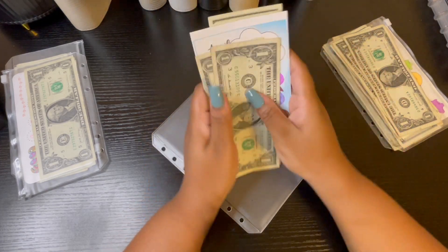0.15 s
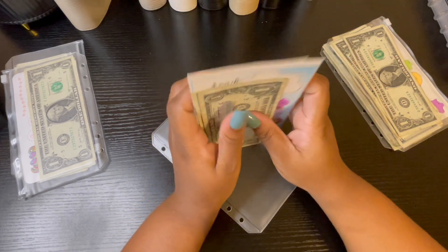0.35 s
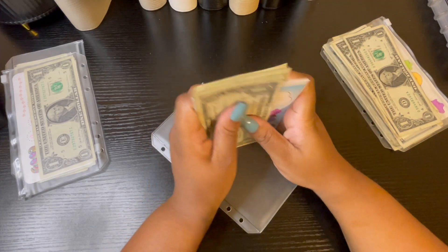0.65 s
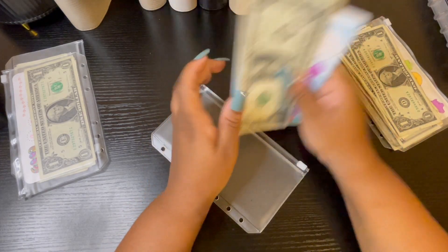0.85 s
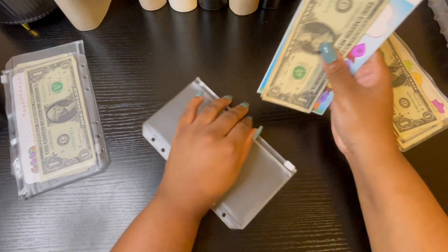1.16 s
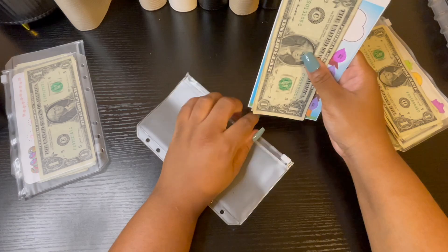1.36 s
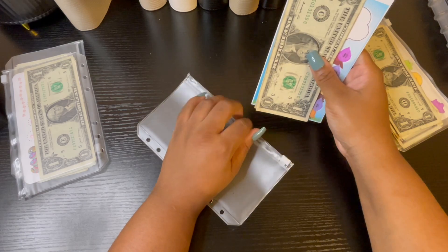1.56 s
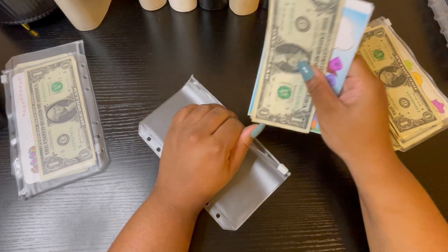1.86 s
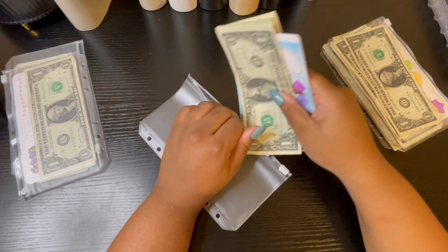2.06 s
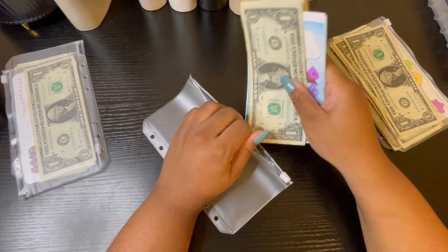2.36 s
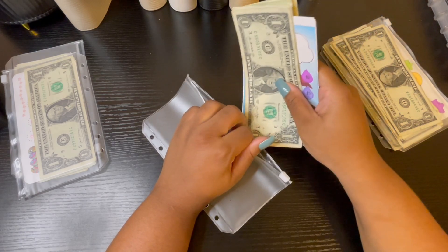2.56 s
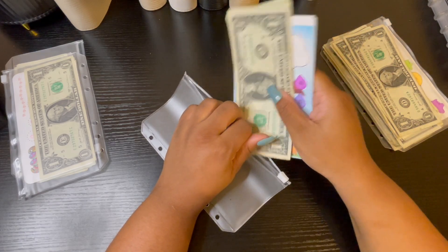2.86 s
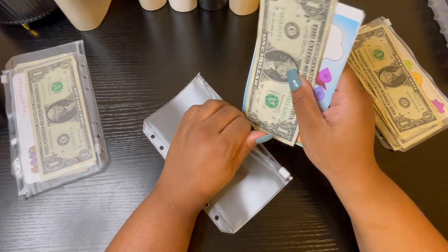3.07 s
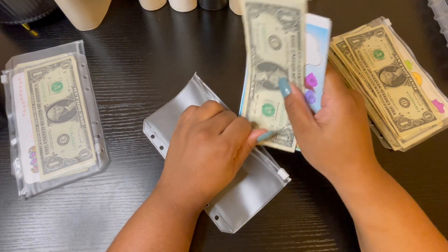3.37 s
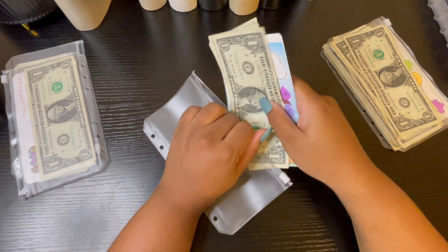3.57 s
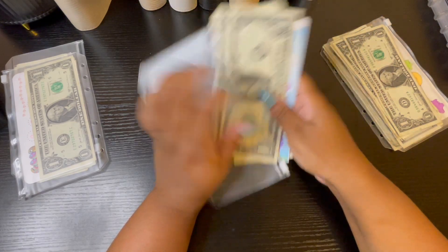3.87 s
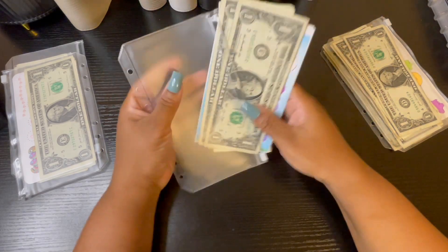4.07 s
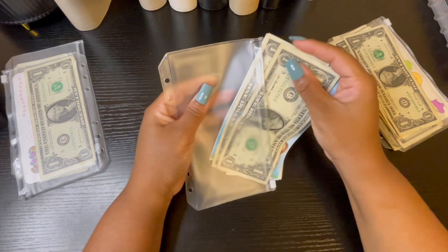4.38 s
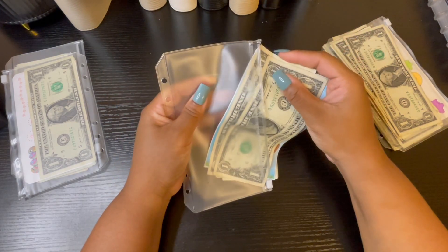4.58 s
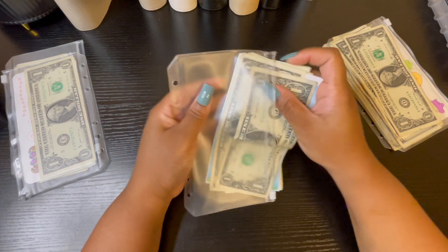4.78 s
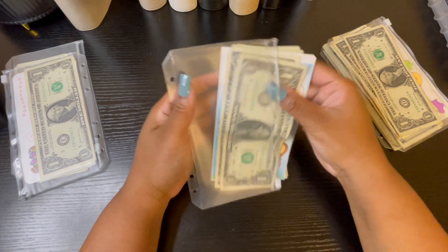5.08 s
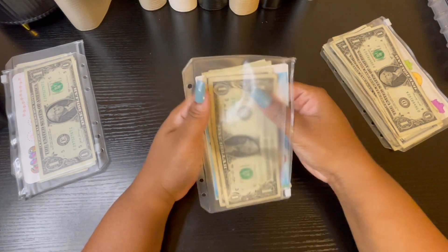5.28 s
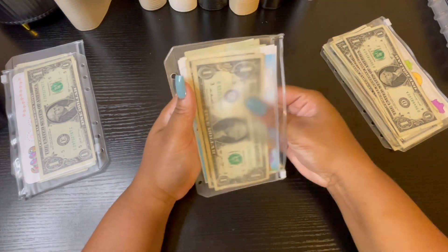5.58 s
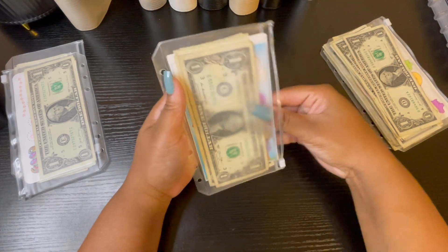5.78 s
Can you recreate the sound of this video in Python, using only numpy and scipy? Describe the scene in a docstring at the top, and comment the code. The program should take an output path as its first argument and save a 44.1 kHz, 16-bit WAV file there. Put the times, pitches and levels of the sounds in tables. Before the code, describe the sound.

Close to the microphone, hands shuffle paper bills in short, dry rustling strokes, with sharp crease snaps and a few soft knocks on a wooden desk. The handling grows busier and louder in the second half as the cash slides into a crinkling plastic pocket, then eases off. A steady electrical hum and a low room rumble sit underneath in a small indoor space.

```python
"""Counting bills at a desk

Close up, from a phone above a wooden desk: hands count paper bills and slide them into a plastic pocket.
The sheets stick and slip in dense tiny jerks, creases snap, and knocks of the hands ring the desk
and shake the paper. Behind them a mains appliance hums over low room rumble.
Room reflections reach the phone's two microphone ports differently and give a little width."""
import sys
import numpy as np
from scipy import signal
from scipy.fft import rfft, irfft
from scipy.io import wavfile
from scipy.ndimage import uniform_filter1d

SR = 44100
rng = np.random.default_rng(int(sys.argv[2]) if len(sys.argv) > 2 else 0)


def dump_mix(stems):
    """Bounce the given channels to the path in sys.argv[1] as a 16-bit WAV at rate SR."""
    frames = np.atleast_2d(stems).T  # one column per channel
    limited = np.clip(frames, -1, 1)  # hard clip at full scale
    pcm = np.round(limited * 32767).astype(np.int16)
    wavfile.write(sys.argv[1], SR, pcm)


N = 261513


def undb(db):
    return 10 ** (np.asarray(db) / 20)


def at_rms(x, db):
    return x * undb(db) / np.sqrt(np.mean(x ** 2))


def per_bin(table):
    """A (frequency [Hz], value) table read at every spectrum bin."""
    hz, value = np.transpose(table)
    return np.interp(np.log(np.arange(N // 2 + 1) * SR / N + 1), np.log(hz + 1), value)


def band(x, hz, width):
    """Two-pole resonance, gain 1 at the centre."""
    return signal.lfilter(*signal.iirpeak(min(hz, .45 * SR), hz / width, SR), x)


def smooth(x, samples):
    return uniform_filter1d(uniform_filter1d(x, samples), samples)


def wander(rate):
    """Random levels held 1 / rate s and smoothed; spread near 1."""
    hold = int(SR / rate)
    return 1.05 * smooth(np.repeat(rng.standard_normal(N // hold + 1), hold), hold)[:N]


# The appliance in the background: (frequency [Hz], rms level [dB])
HUM_TONES = [(59.9, -57), (119.9, -39.5), (147, -72.5), (239.8, -72.5), (359.7, -74)]
def appliance_hum():
    """Mains hum that barely wavers."""
    t = np.arange(N) / SR
    return sum(np.sqrt(2) * undb(db + 0.48 * wander(5.8)) * np.sin(2 * np.pi * (hz * t + rng.random()))
               for hz, db in HUM_TONES)


# The air of the room around the desk: (frequency [Hz], relative spectral density [dB])
ROOM_SPECTRUM = [(25, -43), (45, 7), (65, -6), (100, -1.5), (220, -17.5), (380, -24.5), (480, -37.5),
                 (950, -37), (1150, -33), (1400, -40), (2200, -47.5), (3300, -61.5), (6500, -46),
                 (12000, -48.5), (16000, -46)]
def room_tone():
    """Low rumble and faint air hiss."""
    air = irfft(rfft(rng.standard_normal(N)) * undb(per_bin(ROOM_SPECTRUM)), N)
    return at_rms(air, -49.5)


# What the hands hold, from counting to filling the pocket:
# (time [s], stack gain [dB], pocket gain [dB], edge gain [dB], idle shuffling level [dB])
HANDLING = [(0, -3, 0.5, 1, -69), (0.5, -2.5, -7, 4.5, -80), (0.9, -3, -1, 0.5, -76),
            (1.2, -3, -8, -2.5, -80), (1.7, -7.5, -7, -5, -75.5), (2.2, -6, 0, -1, -90),
            (2.8, -6, -6, -7.5, -62), (3.3, -5.5, -5, -2, -81.5), (3.7, -7, -3, -6.5, -59),
            (3.95, -3, -2.5, -4.5, -70.5), (4.1, -2, -12, -5.5, -89), (4.4, -1, -3.5, -2.5, -72),
            (4.6, 1.5, -2, -8.5, -66.5), (4.9, -3.5, -1.5, -4.5, -60.5), (5.15, 0, 3, -5, -64),
            (5.3, 6.5, 6, -1.5, -80), (5.5, -4, 6.5, -3.5, -68.5), (5.93, -3.5, 2, -6, -72)]
# Slides just below the phone: (start [s], length [s], midpoint level [dB], swell start to end [dB])
SLIDES = [(0.036, 0.034, -65.5, 17), (0.085, 0.075, -55, 0.5), (0.176, 0.075, -59.5, 11),
          (0.422, 0.047, -61, -14), (0.648, 0.042, -62, 3), (0.7, 0.14, -62.5, 4.5),
          (0.936, 0.062, -64.5, 0), (1.047, 0.18, -55, 3), (1.315, 0.12, -71.5, -10),
          (1.667, 0.026, -60.5, -15), (2.029, 0.045, -52, 0), (2.079, 0.11, -55, -1.5),
          (2.219, 0.059, -48, 5), (2.374, 0.2, -67.5, -5.5), (2.638, 0.077, -53.5, 12),
          (2.719, 0.091, -56.5, 0), (2.844, 0.08, -50.5, -5.5), (3.066, 0.13, -57.5, 10.5),
          (3.161, 0.08, -55, -16), (3.347, 0.1, -67, -12), (3.501, 0.064, -52.5, 14),
          (3.559, 0.053, -51.5, -12), (3.603, 0.18, -52, 4.5), (3.802, 0.082, -50.5, -2),
          (4.004, 0.033, -46, 8), (4.07, 0.041, -60, -17), (4.171, 0.072, -57.5, -21),
          (4.262, 0.036, -51, -1), (4.309, 0.051, -51.5, -6), (4.419, 0.12, -58.5, 4),
          (4.633, 0.017, -41.5, -4), (4.765, 0.11, -50.5, -6), (4.87, 0.12, -60.5, 3),
          (5.058, 0.054, -50.5, 22), (5.124, 0.035, -41.5, 0), (5.161, 0.04, -36.5, 1),
          (5.191, 0.082, -64.5, -17), (5.286, 0.13, -60.5, -3), (5.458, 0.083, -54.5, 4),
          (5.676, 0.113, -60.5, -4.5), (5.825, 0.06, -69.5, -4)]
def hand_motion(grip_s=0.029, shake_t60_s=0.13, shake_lead_s=0.0062):
    """Gains of sheet, stack, pocket and edges as the hands shuffle, slide and knock."""
    t = np.arange(N) / SR
    when, *columns = np.transpose(HANDLING)
    stack_db, pocket_db, edge_db, idle_db = (np.interp(t, when, column) for column in columns)
    gain = undb(idle_db)
    for start, length, db, swell_db in SLIDES:
        sliding = (t >= start) & (t < start + length)
        gain[sliding] = undb(db + swell_db * ((t[sliding] - start) / length - .5))
    gain = smooth(gain, int(grip_s * SR / 2))  # a stroke takes a moment to catch and to let go
    for time, db, _, shake_db in HAND_KNOCKS:  # each knock on the desk shakes the sheets
        age = t - time + shake_lead_s
        gain += np.clip(age / shake_lead_s, 0, 1) * undb(db + shake_db - 60 * np.abs(age) / shake_t60_s)
    dull_db = -0.1928 * (20 * np.log10(gain) + 56)  # the stack stands out more in weak strokes
    return gain * undb([np.zeros(N), stack_db + dull_db, pocket_db, edge_db])


def stick_slip(per_s, spread_db, bed_db):
    """Friction jerks of very uneven size over a smooth rubbing bed."""
    slipping = rng.random(N) < per_s / SR
    jerks = slipping * undb(spread_db * rng.exponential(size=N)) * rng.standard_normal(N)
    return at_rms(jerks, 0) + undb(bed_db) * rng.standard_normal(N)


def flex(friction, modes):
    """Broad resonances with steep skirts; each waxes and wanes as the sheet bends."""
    out = np.zeros(N)
    for k, (hz, width, db) in enumerate(modes):
        gain = undb(db + 2.92 * wander(35) + 1.37 * wander(8))
        out += (-1) ** k * gain * band(band(friction, hz, width), hz, width)
    return out


# Resonances of one bill, the stack, the pocket wall and the paper edges, heard close up:
# (centre [Hz], width [Hz], relative level [dB])
SHEET_MODES = [(2970, 1320, 0), (4040, 970, -3), (5030, 2850, -11.5)]
STACK_MODES = [(706, 595, 2), (1253, 700, 0)]
POCKET_MODES = [(1674, 420, 8), (2130, 1780, 0.5)]
EDGE_MODES = [(5920, 2070, 3), (8120, 2040, -0.5), (9415, 390, 12), (11850, 2000, 0.5), (13600, 5300, -47)]
def paper_rustle():
    """Sheet, stack, pocket and edges each slip on their own; lone crinkles shake them all at once."""
    crinkles = stick_slip(per_s=70, spread_db=4, bed_db=-33) * undb(-8.5)
    rubs = []
    for modes, db in (SHEET_MODES, -.5), (STACK_MODES, -1.5), (POCKET_MODES, -1.5), (EDGE_MODES, 1.5):
        friction = stick_slip(per_s=3000, spread_db=2.03, bed_db=2) + crinkles
        rubs.append(at_rms(flex(friction, modes), db))
    rustle = (hand_motion() * rubs).sum(axis=0)
    return rustle * undb(2.1 * wander(90))  # grip flickers faster than the hands move


def settling_creases(per_s=14, floor_db=-57.5, spread_db=3.5):
    """Faint ticks of creases settling at random moments, as rows like CREASE_SNAPS."""
    when, size, pitch, dullness = rng.random((int(per_s * N / SR), 4)).T
    db = floor_db - spread_db * np.log(1 - size)
    return list(zip(when * N / SR, db, 1200 * 2 ** (1.73 * pitch), -16 * dullness))


# Creases and nails near the microphone: (time [s], crack peak [dB], centre [Hz], tick re crack [dB])
CREASE_SNAPS = [(0.091, -47, 1290, 11.5), (0.212, -42.5, 900, -6), (0.326, -46.5, 1170, 7),
                (0.366, -30.5, 4340, -7), (0.372, -19, 3040, -8), (0.383, -25, 4100, 4.5),
                (0.658, -42, 3960, 0), (0.616, -50, 2540, -3), (0.778, -39.5, 905, 7.5),
                (0.977, -28.5, 3400, 0), (0.989, -15, 3770, 4.5), (1.238, -27, 4560, -0.5),
                (1.245, -29, 1540, 2.5), (1.36, -40.5, 2490, -2), (1.432, -41, 5952, -14),
                (1.474, -51, 1600, -1), (1.815, -35, 1680, -1), (2.033, -40, 1160, 10),
                (2.088, -38.5, 1730, -11), (2.162, -33.5, 3980, -21), (2.216, -46, 2500, -8),
                (2.845, -51, 3300, -19), (2.985, -43, 2940, -1.5), (3.513, -32, 2940, -24),
                (3.761, -28.5, 2380, -23), (3.818, -32, 2620, -19), (3.831, -27, 2300, -14),
                (3.879, -33.5, 790, -4), (3.98, -41.5, 1020, 3), (4.015, -40, 3480, -15),
                (4.029, -26.5, 1290, 1), (4.061, -21.5, 710, -4.5), (4.156, -49, 3000, -2),
                (4.168, -37, 770, -14), (4.426, -35.5, 680, -3), (4.635, -23, 2930, -9),
                (4.656, -12.5, 1960, -33), (4.752, -20, 1910, -26), (5.072, -32, 2360, -2),
                (5.105, -42, 2480, -15), (5.12, -19, 1740, -25), (5.15, -35, 2780, -20),
                (5.46, -41, 1960, -21), (5.854, -51, 2980, -12), (5.898, -45, 1920, -17)]
def crease_snaps(snap_t60_s=0.013, rattle_t60_s=0.045):
    """A crease flips: a sharp crack coloured by its size, a bright tick and a short rattling tail."""
    span = 4096
    out, t = np.zeros(N + span), np.arange(span) / SR
    rows = CREASE_SNAPS + settling_creases()
    stutters = undb(3.9 * np.repeat(rng.standard_normal((len(rows), 32)), 128, axis=1))  # 3 ms steps
    attack = 1 - np.exp(-t / 0.000097)
    for (time, db, hz, tick_db), stutter in zip(rows, stutters):
        noise = rng.standard_normal((2, span))
        noise[:, 8] += 3.5  # the flip itself is one clean jolt
        decay = undb(-60 * t / snap_t60_s) + 0.12 * stutter * undb(-60 * t / rattle_t60_s)
        push = noise * decay * attack
        crack = band(band(push[0], hz, 0.52 * hz), hz, 3.8 * hz)
        tick = band(band(push[1], 9740, 3600), 5200, 9100)
        snap = crack / np.abs(crack).max() + undb(tick_db) * tick / np.abs(tick).max()
        out[int(time * SR):][:span] += undb(db) * snap
    return out[:N]


# The wooden desk under the phone: (frequency [Hz], relative level [dB], t60 at zero tilt [s])
DESK_MODES = [(91, -5.5, 0.16), (148, 4, 0.14), (229, 0, 0.19), (305, 3, 0.061), (383, -5.5, 0.12),
              (449, -7, 0.086), (668, -5, 0.065), (880, 3.5, 0.021)]
# Hands and stack landing on it: (time [s], peak [dB], tilt [dB/octave], sheet shake re peak [dB])
HAND_KNOCKS = [(0.388, -34.5, 1, -6.5), (0.989, -24.5, 5, -10.5), (1.257, -29.5, 0.5, -11),
               (1.812, -39, -5.5, -7.5), (3.877, -42, 4.5, -31), (4.059, -26, 9, -19), (4.169, -37, 9, -28),
               (4.426, -45, 0, -12), (4.655, -19.5, 7.5, -12.5), (4.75, -36, 7, -4), (5.118, -31.5, 7, -20)]
def desk_knocks():
    """A soft push rings the desk modes; blows tilted towards the upper ones die sooner."""
    span = 16384
    out, t = np.zeros(N + span), np.arange(span) / SR
    hz, mode_db, t60 = np.transpose(DESK_MODES)[:, :, None]
    attack = 1 - np.exp(-t / 0.0012)
    for time, db, tilt_db, _ in HAND_KNOCKS:
        scatter = rng.standard_normal((len(DESK_MODES), 1))  # nudges each mode's level and pitch
        start_db = mode_db + tilt_db * np.log2(hz / 250) + 0.75 * scatter
        decay_db = 60 * t / t60 * undb(1.06 * tilt_db)
        modes = undb(start_db - decay_db) * np.sin(2 * np.pi * hz * (1 + 0.026 * scatter) * t)
        thud = modes.sum(axis=0) * attack
        out[int(time * SR):][:span] += thud * undb(db) / np.abs(thud).max()
    return out[:N]


def reflections(t60_s):
    """Spectrum of a decaying spray of echoes with unit energy."""
    echo = rng.standard_normal(16384) * undb(-60 * np.arange(16384) / SR / t60_s)
    return rfft(echo / np.linalg.norm(echo), N)


# How far the phone's left port leads the right: (frequency [Hz], phase [rad])
PORT_PHASE = [(0, 0), (300, 0), (1200, -.3), (1500, 0), (4100, .6), (6300, .8), (7400, 1.6), (8400, 2.5),
              (10500, 3.14), (12700, 4.7), (13500, 6.1), (22000, 6.3)]
# Diffuse sound at the ports: (frequency [Hz], side level re mid [dB])
PORT_SPREAD = [(100, -78), (160, -37), (250, -12), (550, 1.5), (1200, -5), (1900, -17), (3000, -7.5),
               (4800, -4), (6500, -4.5), (15000, -34.5)]
def microphone_ports(mid):
    """Mono spectrum to stereo: reflections reach the ports as a smeared copy, opposite left and right."""
    side = mid * reflections(t60_s=0.037) * undb(per_bin(PORT_SPREAD))
    turn = np.exp(.5j * per_bin(PORT_PHASE))
    return np.array([irfft((mid + side) * turn, N), irfft((mid - side) / turn, N)])


def scene():
    """Paper and desk up close with a little reverberation, hum and room tone behind."""
    close = rfft(paper_rustle() + crease_snaps() + desk_knocks())
    in_room = close * (1 + undb(-13) * reflections(t60_s=0.33))
    background = rfft(appliance_hum() + room_tone())
    return microphone_ports(in_room + background)


def record(dry, dull_hz=12500, top_hz=15900):
    """The phone dulls the highest treble and cuts the top."""
    dulled = signal.lfilter(*signal.butter(2, dull_hz, fs=SR), dry)
    return signal.sosfilt(signal.ellip(10, .2, 80, top_hz, fs=SR, output="sos"), dulled)


dry = scene()
out = record(dry)
dump_mix(out)
```